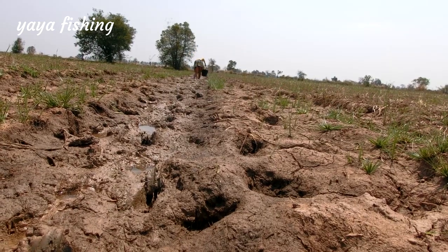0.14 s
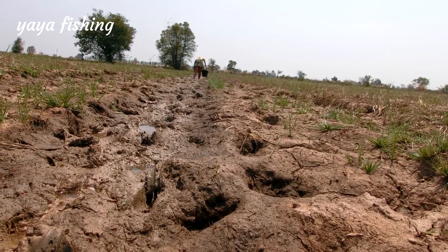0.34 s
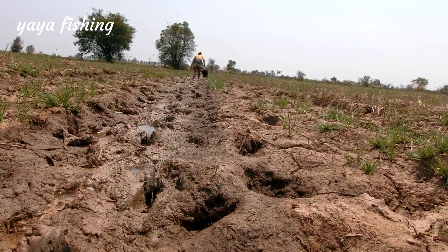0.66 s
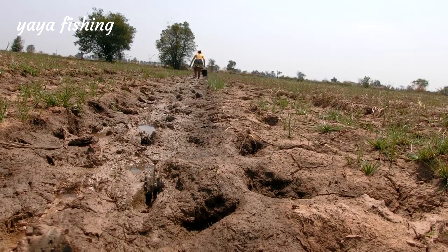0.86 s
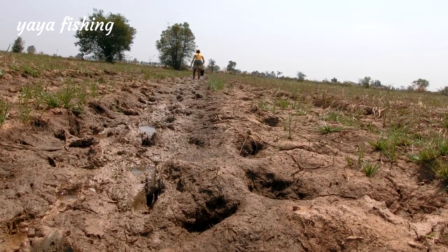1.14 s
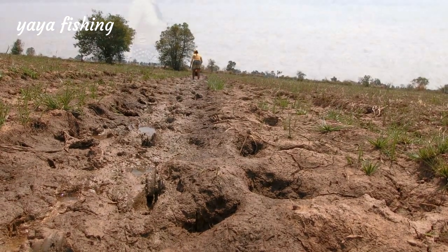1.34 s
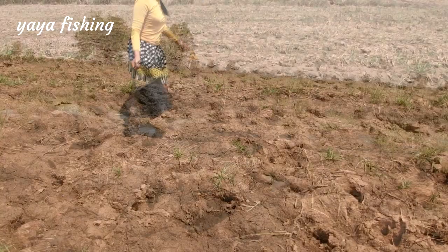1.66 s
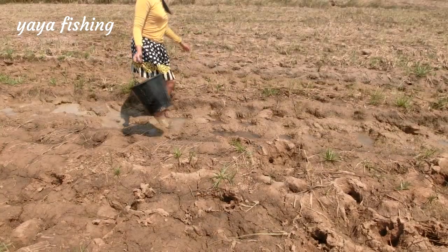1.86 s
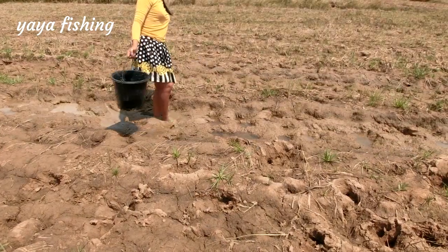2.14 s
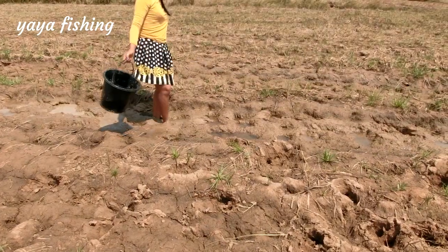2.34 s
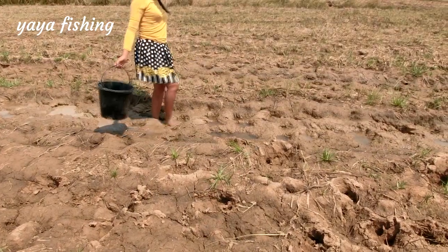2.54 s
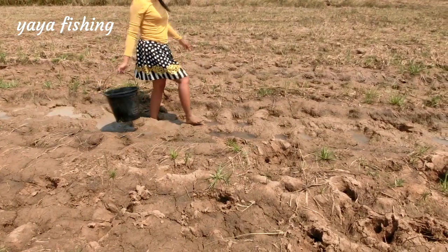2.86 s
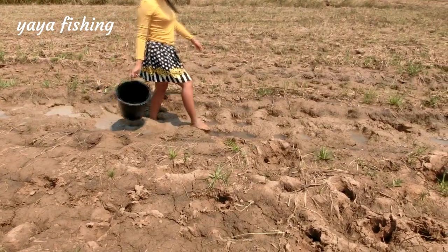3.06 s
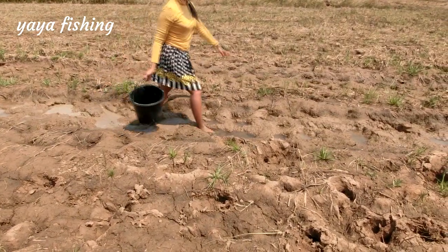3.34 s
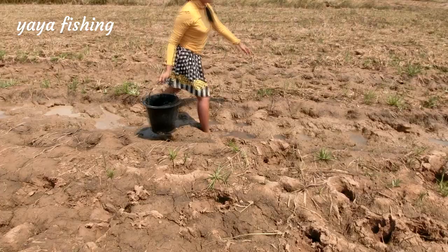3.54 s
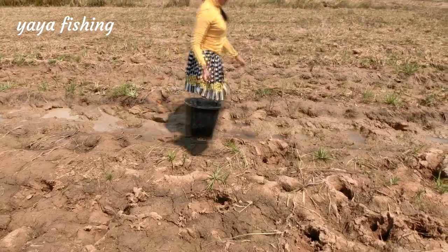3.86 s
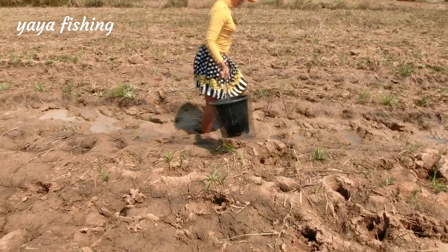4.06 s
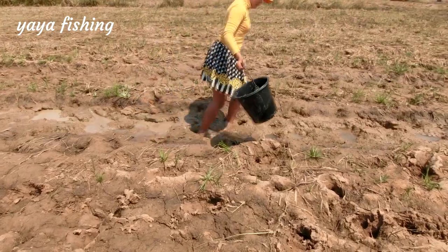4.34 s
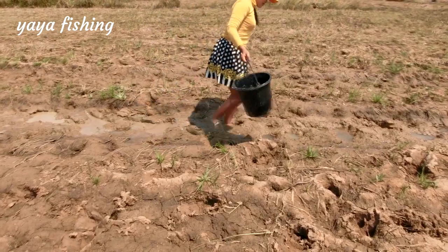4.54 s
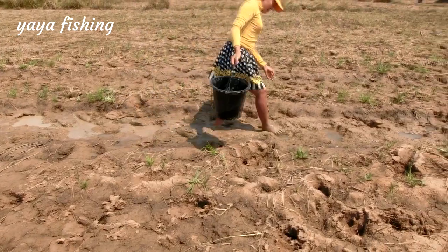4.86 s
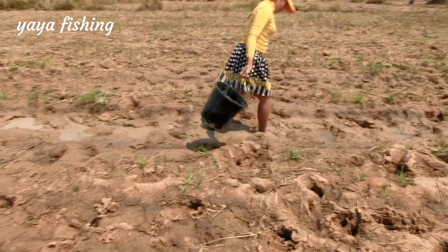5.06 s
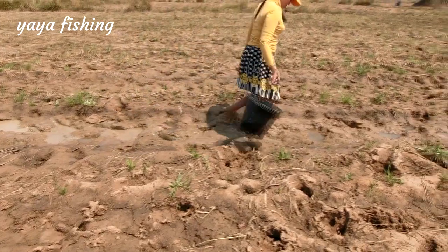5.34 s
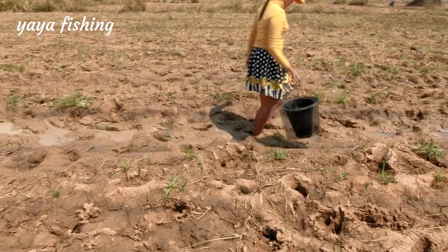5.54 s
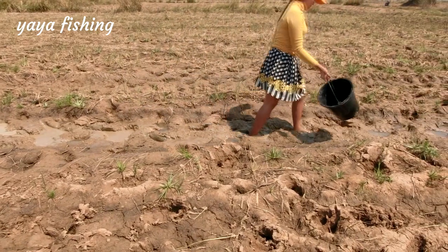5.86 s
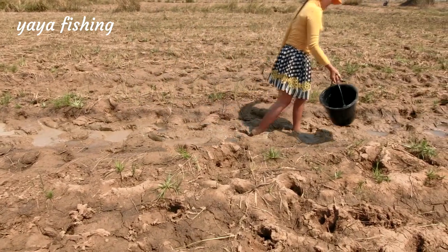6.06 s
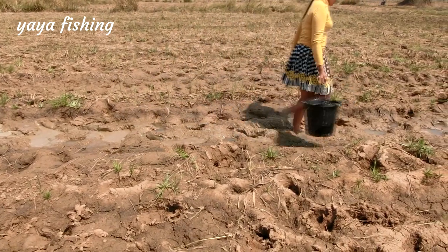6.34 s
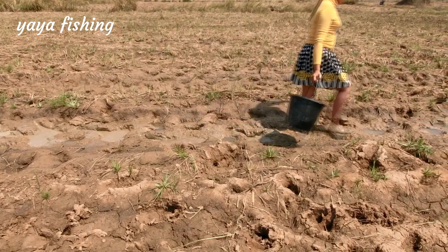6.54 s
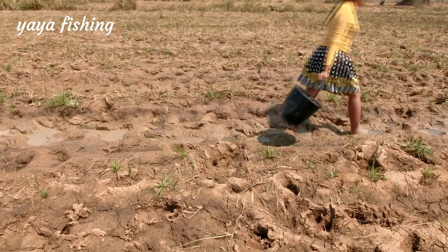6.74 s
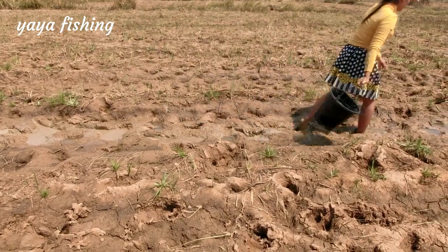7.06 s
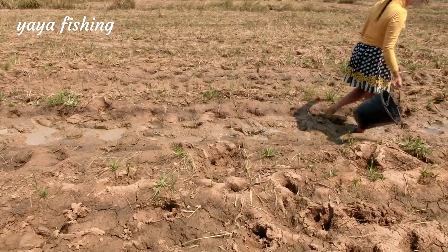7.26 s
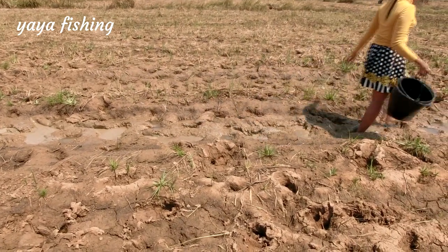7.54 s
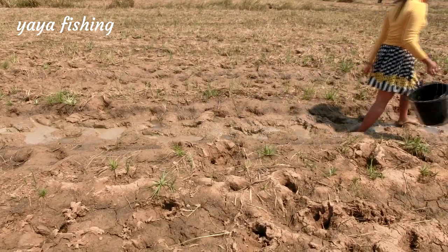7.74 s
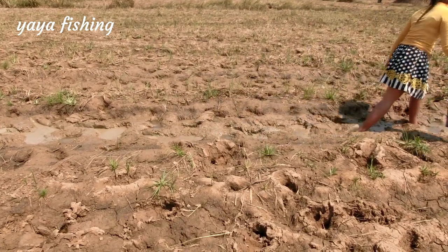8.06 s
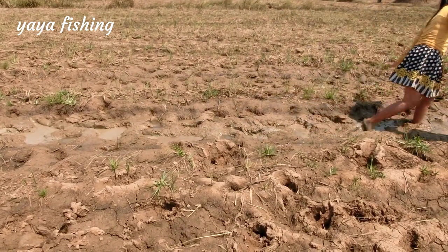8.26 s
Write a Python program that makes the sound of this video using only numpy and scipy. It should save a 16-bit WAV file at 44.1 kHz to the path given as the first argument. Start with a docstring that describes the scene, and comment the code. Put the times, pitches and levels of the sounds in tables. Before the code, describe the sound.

Someone walks barefoot through sticky, waterlogged mud outdoors, heard fairly close and dry, with little echo. Before the steps come a very short, high cricket chirp and a pair of thin insect rasps over nearly silent air. Each slow step mixes bubbly gurgling, crisp crackle, fine spray, ragged pops and occasional dull thuds. The strongest is a thick cluster of wet smacks near the middle; later squelches are sparser and finish quietly.

```python
"""Faint air with a wavering bass and a soft hiss lies under an open field. A cricket chirps once, fast sliding strokes,
and another insect rasps twice, high ticking noise. Then bare feet wade through wet mud a few metres away: gurgle,
crackle and spray are swarms of tiny damped sines in noise; bubbles snap open with a crack and a ring; air pockets pop
hollow and ragged; the wet surface smacks in bursts of noise; low damped sines thud as a foot reaches firm ground."""
import sys
import numpy as np
from scipy import signal
from scipy.fft import rfft, irfft, next_fast_len
from scipy.io import wavfile
from scipy.ndimage import map_coordinates

SR = 44100
rng = np.random.default_rng(int(sys.argv[2]) if len(sys.argv) > 2 else 0)


def put_to_file(sound):
    """Save the sound as 16-bit audio at rate SR, in the file named by the first command-line argument."""
    columns = np.atleast_2d(sound).T  # one column per channel
    safe = np.clip(columns, -1, 1)
    whole_steps = np.round(safe * 32767)
    wavfile.write(sys.argv[1], SR, whole_steps.astype(np.int16))


N = 370263

LEAD = 400  # samples kept ahead of a burst's peak
SINCE = (np.arange(1600) - LEAD) / SR  # seconds from that peak


def amp(db):
    """Decibels to amplitude."""
    return 10 ** (np.asarray(db) / 20)


def unit(x):
    """Scale to an rms of 1."""
    return x / np.sqrt(np.mean(x ** 2) + 1e-20)


def along(points, hz):
    """Read (frequency [Hz], value) points on a log frequency axis."""
    f, value = np.transpose(points)
    return np.interp(np.log(hz + 1), np.log(f + 1), value)


def curves(rows):
    """One dB value per sample for each column after the time, silent outside."""
    s, *columns = np.transpose(rows)
    t = np.arange(N) / SR
    return [np.interp(t, s, column, left=-140, right=-140) for column in columns]


def drift(step):
    """A smooth random curve with a new random point every step samples."""
    return map_coordinates(rng.standard_normal(N // step + 4), [np.arange(N) / step])


def filtered(x, response):
    """Filter x by a (possibly complex) response of frequency in Hz."""
    m = next_fast_len(N + SR // 2)
    return irfft(rfft(x, m) * response(np.fft.rfftfreq(m, 1 / SR)), m)[..., :N]


def above(x, lo_hz):
    """Steep causal high-pass."""
    return filtered(x, lambda hz: (1j * hz / (lo_hz + 1.4j * hz - hz * hz / lo_hz) * 1j * hz / lo_hz) ** 2)


def scatter(s, rows):
    """Sum of short sounds (rows), each starting at its time s."""
    at = np.round(s * SR).astype(int)[:, None] + np.arange(rows.shape[1])
    return np.bincount(at.ravel(), rows.ravel(), N + SR)[:N]


def bubbles(s, db, hz, t60, rise, attack, size):
    """Damped sines whose pitch climbs as the cavity closes."""
    t = np.arange(size) / SR
    hz, t60 = hz[:, None], np.clip(t60, .0005, .25)[:, None]
    tone = np.sin(2 * np.pi * hz * (t + rise * t * t / t60))
    decay = amp(db[:, None] - 60 * t / t60)
    return scatter(s, decay * (1 - np.exp(-t / attack)) * tone)


def swarm(count, hz, spread, cycles, uneven_db, hiss, size):
    """Bubbles at random moments, sizes and pitches over a share of noise, bunched in clumps; rms 1."""
    when, pitch = rng.random(count), rng.standard_normal(count)
    big = np.minimum(rng.exponential(1, count), 3.5)
    f = np.clip(hz * np.exp(spread * pitch), 450, 15000)
    grains = unit(bubbles(when * N / SR, uneven_db * big, f, cycles / f, 0.23, 0.000048, size))
    noise = filtered(rng.standard_normal(N), lambda w: np.exp(-.5 * (np.log((w + 1) / hz) / spread) ** 2))
    clumps = amp(3.2 * drift(1500))
    return unit((grains + hiss * unit(noise)) * clumps)


def burst(db, rise_ms, fall_ms, tail_db, linger):
    """Envelopes that halve in rise_ms before and fall_ms after the peak, plus a weak tail linger times slower."""
    rise, fall = [np.clip(v, .2, 20)[:, None] / 1000 for v in (rise_ms, fall_ms)]
    main = amp(-6 * np.where(SINCE < 0, -SINCE / rise, SINCE / fall))
    main = main * np.clip((SINCE - SINCE[0]) / .005, 0, 1)  # fade in without a click
    tail = (SINCE > 0) * amp(tail_db - 6 * SINCE / (fall * linger))
    return amp(db)[:, None] * (main + tail)


def ragged(hz, rough, glide):
    """Tones whose phase wanders as the soft walls tremble, and whose pitch climbs as the cavity closes."""
    hz = hz[:, None]
    wander = np.cumsum(rng.standard_normal((len(hz), len(SINCE))), axis=1) * np.sqrt(hz / SR)
    climb = SINCE + glide * np.maximum(SINCE, 0) ** 2
    return np.sin(2 * np.pi * hz * climb + rough * wander)


# colour of smack and spray: (frequency [Hz], level [dB per Hz])
SPRAY_COLOUR = [(880, -35), (1500, 25.5), (1920, 3.5), (2140, -2.5), (2770, -13.5), (3060, 3), (4640, -1.5),
                (5170, -2.5), (6370, -15.5), (7610, -9.5), (9470, -15), (12700, -16.5), (16000, -28.5)]


def bright(x, lo_hz):
    """Give x the wet spray colour above lo_hz."""
    return filtered(x, lambda hz: amp(along(SPRAY_COLOUR, hz)) / (1 + (lo_hz / (hz + 1)) ** 8))


AIR_DB = -63  # rms before the bass wavers and the channels are trimmed
# colour of the air before it is scaled: (frequency [Hz], level [dB per Hz])
AIR_COLOUR = [(12, 5), (25, -4.5), (60, -9.5), (120, -12.5), (270, -13.5), (450, -15), (700, -11),
              (950, -15.5), (1150, -18), (1600, -13), (2100, -18), (3000, -20.5), (11000, -24),
              (14900, -21.5), (16000, -38)]
# how alike the air is left and right: (frequency [Hz], correlation [0 to 1])
AIR_LIKENESS = [(60, 0.26), (150, 0.075), (380, 0.14), (950, 0.44), (2380, 0.036), (5980, 0.0096),
                (15000, 0.016)]


def air():
    """Distant air partly shared by both channels, hiss hardly at all; a light breeze makes the bass waver."""
    def mid_and_side(hz):
        turn = np.arccos(np.clip(along(AIR_LIKENESS, hz), -1, 1)) / 2
        return amp(along(AIR_COLOUR, hz)) * np.array([np.cos(turn), np.sin(turn)])

    mid, side = filtered(rng.standard_normal((2, N)), mid_and_side)
    pair = unit(np.array([mid + side, mid - side]))
    bass = filtered(pair, lambda hz: 1 / (1 + (hz / 170) ** 4))
    breeze = amp(0.77 * drift(6000) - 1.0)
    return amp(AIR_DB) * (pair - bass + bass * breeze)


CHIRP_S, CHIRP_DB = .1325, -49.5  # time of stroke 0, level of a full stroke before its random spread
CHIRP_STROKES, STROKE_HZ = 19.4, 158.6  # end of the chirp in strokes, strokes a second


def cricket():
    """Each wing stroke is a brief tone sliding down, after a faint run-up; grass nearby smears it a little."""
    t, k = np.arange(190) / SR, np.arange(-11, CHIRP_STROKES)
    stroke = np.sin(np.pi * t / t[-1]) ** 2 * np.sin(2 * np.pi * (8150 * t - 120000 * t * t))
    rise_db = np.clip(4.8 * (k - 1.5), -17, 0)
    fall_db = -5.5 * (k - CHIRP_STROKES + 1.6)
    size = amp(CHIRP_DB + np.minimum(rise_db, fall_db) + rng.normal(0, 0.98, len(k)))
    chirp = scatter(CHIRP_S + k / STROKE_HZ, size[:, None] * stroke)
    grass = rng.standard_normal(1300) * amp(-60 * np.arange(1300) / SR / 0.08)
    smear = signal.fftconvolve(chirp, grass / np.linalg.norm(grass))[:N]
    return chirp + amp(-4.0) * smear


RASP_RISE_DB_PER_S, RASP_FALL_DB_PER_S = 480, 450
# rasps of the second insect: (time of the peak [s], level [dB])
RASP_PEAKS = [(1.0, -63), (1.072, -55)]


def rasp():
    """High noise scraped in quick ticks, 190 a second, swelling and fading at each rasp."""
    t = np.arange(N) / SR
    ticks = 1 + 0.58 * np.maximum(np.sin(2 * np.pi * 190 * t), 0) ** 6
    hiss = filtered(rng.standard_normal((2, N)), lambda hz: np.exp(-((hz - 12300) / 2600) ** 2))
    swell = 0
    for s, db in RASP_PEAKS:
        slope_db = np.minimum(RASP_RISE_DB_PER_S * (t - s), RASP_FALL_DB_PER_S * (s - t))
        swell = swell + amp(db + slope_db)
    return swell * unit(ticks * hiss)


AFTER_S, FOLLOWS = 0.032, 0.28  # spread of the stirring round a burst, share of the burst's dB it follows


def aftermath(events):
    """Gain of 1 or more: how much the given bursts stir the mud nearby, just before and after them."""
    s, db = np.transpose(events)[:2]
    kicks = np.bincount((s * SR).astype(int), amp(2 * FOLLOWS * (db + 39.5)), N)
    bell = np.exp(-(np.arange(-6000, 6001) / SR / AFTER_S) ** 2)
    return np.sqrt(1 + 1.04 * np.abs(signal.fftconvolve(kicks, bell, "same")))


# how hard the feet stir the mud, before layer trims and aftermath gain:
# (time [s], overall level [dB], gurgle against overall [dB], spray against overall [dB])
STIRRING = [(1.3, -85, 6, -18), (1.55, -61.5, -0.5, -7), (2.0, -66, -4, 2), (2.5, -64, 2, -5.5),
            (2.75, -62.5, -4.5, -9), (2.95, -69, -10, 1), (3.18, -58.5, -7, -3.5), (3.5, -61.5, 1.5, -9),
            (3.9, -56, -1.5, -7), (4.2, -63.5, -5.5, 0), (4.5, -60.5, 2, -2), (4.9, -59.5, -5.5, -5.5),
            (5.28, -55.5, -10.5, -11), (5.55, -66, -7.5, -1), (5.95, -57, -10, -7), (6.1, -68.5, -2.5, -4),
            (6.4, -58.5, -7, -5), (6.62, -66, -12, -2), (6.9, -61, 1.5, -4.5), (7.3, -58.5, -11.5, -10.5),
            (7.55, -71, 3, 0.5), (8.0, -64, -3, -12), (8.4, -65.5, 2.5, -2.5)]


def stirred():
    """Small bubbles gurgle, the wet film crackles and fine spray hisses while a foot moves."""
    overall_db, gurgle_db, spray_db = curves(STIRRING)
    gurgle = swarm(count=2500, hz=1006, spread=0.446, cycles=40, uneven_db=6.5, hiss=1.0, size=900)
    crackle = swarm(count=7000, hz=3790, spread=0.37, cycles=28, uneven_db=8.5, hiss=0.79, size=300)
    mist = swarm(count=12000, hz=11000, spread=0.41, cycles=30, uneven_db=7.0, hiss=0.77, size=100)
    spray = unit(bright(mist, 6320))
    film = aftermath(MUD_SMACKS) * (amp(-6.5) * crackle + amp(spray_db - 2.5) * spray)
    depths = aftermath(AIR_POCKETS + BUBBLE_SNAPS) * amp(gurgle_db - 4.0) * gurgle
    return amp(overall_db) * (depths + film)


SNAP_RISE_MS, SNAP_CYCLES = 0.2, 2.27  # halving time of the rise, cycles for the ring to halve
CRACK_MS, CRACK_DB = 0.49, -2  # halving time of the crack, its level against the ring before filtering
# bubbles that snap open at once: (time of the peak [s], level before filtering [dB], pitch [Hz])
BUBBLE_SNAPS = [(1.409, -53, 2150), (1.933, -32.5, 2040), (2.1082, -38, 826), (2.3753, -32, 6230),
                (3.3005, -36.5, 4400), (3.4281, -32, 810), (3.5663, -33, 2770), (3.6125, -34, 3460),
                (3.7759, -29, 822), (5.423, -27.5, 1120), (5.764, -35, 2340), (6.4345, -39, 3630),
                (7.052, -39, 1250), (7.06, -42.5, 2530), (7.2855, -22.5, 1600), (7.3001, -24, 3640),
                (7.4094, -42.5, 1710), (1.9165, -41, 6000), (4.0342, -40, 7060), (6.1765, -33, 3100),
                (7.802, -52.5, 2500), (7.9545, -44.5, 830), (8.0065, -40, 850), (8.125, -42.5, 1770),
                (8.1346, -48, 5000), (8.158, -50, 910), (8.2834, -45.5, 2190), (8.3685, -47.5, 1060)]


def snaps():
    """The skin of a bubble breaks with a crack, and the cavity rings down cleanly."""
    s, db, hz = np.transpose(BUBBLE_SNAPS)
    rise_ms, crack_ms = np.full(len(s), SNAP_RISE_MS), np.full(len(s), CRACK_MS)
    ring = burst(db, rise_ms, SNAP_CYCLES * 1000 / hz, tail_db=-18.5, linger=7.1)
    ring = scatter(s - LEAD / SR, ring * ragged(hz, rough=0.31, glide=2.65))
    crack = burst(db + CRACK_DB, rise_ms, crack_ms, tail_db=-11, linger=12)
    crack = scatter(s - LEAD / SR, crack * rng.standard_normal(crack.shape))
    crack = filtered(crack, lambda f: 1 / (1 + 1j * f / 4500))  # soften the treble
    return above(ring + crack, 600)


POP_RISE_MS, POP_FALL_MS = 2.03, 1.49  # halving times of a 1 kHz pocket
BIG_IS_SLOW = 0.13  # lower pockets take longer by this power of pitch
TAIL_DB, LOUD_IS_DRY = -15.5, 0.38  # tail under a -44.5 dB pop; louder pops keep less of it, dB per dB
# air pockets bursting in the mud: (time of the peak [s], level before mixing its parts [dB], pitch [Hz])
AIR_POCKETS = [(1.6203, -47, 800), (1.618, -50, 1560), (1.79, -57, 1680), (1.933, -37, 535),
               (1.9425, -39, 887), (1.9473, -43.5, 1600), (1.9801, -40.5, 923), (2.009, -43, 1050),
               (2.117, -47, 1140), (2.1405, -43.5, 870), (2.19, -52, 893), (2.316, -51, 900),
               (2.398, -50, 900), (2.3302, -45.5, 1040), (2.352, -45.5, 585), (2.364, -47.5, 1135),
               (2.3706, -43, 1440), (2.4093, -41.5, 1400), (2.4125, -45.5, 820), (2.4239, -49, 1520),
               (2.4907, -49, 1880), (2.5885, -45.5, 570), (2.637, -49.5, 1124), (2.6856, -48.5, 800),
               (2.7082, -47, 1520), (2.7269, -47, 1600), (2.741, -48.5, 793), (2.7849, -46, 1574),
               (2.8051, -45, 1196), (2.818, -41, 1560), (3.336, -51.5, 2220), (3.4493, -48, 900),
               (3.5232, -44.5, 850), (3.527, -44.5, 1400), (3.625, -45, 514), (3.739, -46, 1770),
               (3.797, -37.5, 450), (3.823, -39, 470), (3.8276, -43, 673), (3.8679, -45, 1420),
               (3.8753, -40.5, 976), (3.8822, -39, 1273), (3.97, -53, 2230), (3.9803, -49.5, 1480),
               (4.166, -30, 1464), (4.17, -21.5, 1443), (4.1832, -38.5, 630), (4.1856, -35, 1740),
               (4.192, -42, 1580), (4.309, -38, 970), (4.3178, -36, 820), (4.3276, -34, 944),
               (4.339, -42, 1900), (4.3434, -31.5, 940), (4.345, -32, 566), (4.3494, -36, 1670),
               (4.357, -26.5, 830), (4.3602, -36, 1930), (4.361, -34.5, 573), (4.3677, -28, 863),
               (4.3758, -39, 886), (4.377, -32, 574), (4.438, -46, 1196), (4.445, -45, 587),
               (4.4615, -46, 1210), (4.488, -48, 1110), (4.493, -45, 2210), (4.512, -50, 1144),
               (4.886, -48.5, 733), (4.977, -43.5, 728), (5.0, -47, 1240), (5.132, -46.5, 1160),
               (5.164, -46.5, 1520), (5.21, -52, 900), (5.24, -44, 1196), (5.2733, -48, 870),
               (5.3078, -44, 1470), (5.36, -44.5, 1660), (5.3886, -44.5, 1026), (5.768, -45, 1710),
               (5.8235, -44, 1520), (5.88, -50.5, 1150), (5.9434, -45.5, 1077), (5.959, -47, 1670),
               (5.992, -52, 1690), (6.1509, -49, 623), (6.1657, -46, 690), (6.1672, -46, 1215),
               (6.1775, -42, 636), (6.1775, -44.5, 1250), (6.3706, -41, 662), (6.402, -44.5, 1660),
               (6.435, -55, 1590), (6.6102, -52.5, 1760), (6.812, -53, 1095), (6.8746, -49.5, 774),
               (6.8888, -47.5, 1100), (7.134, -48, 784), (7.2202, -49.5, 756), (7.234, -54, 785),
               (7.268, -49, 1000), (7.2895, -29.5, 1140), (7.297, -33, 1070), (7.302, -40, 695),
               (7.313, -51, 1200), (7.966, -48, 910), (7.99, -50, 870), (8.272, -51.5, 1570),
               (8.18, -48, 1830)]


def pops():
    """Each pocket rings raggedly at its pitch, with a weaker neighbour and a slap of mud."""
    s, db, hz = np.transpose(AIR_POCKETS)
    slow = (1000 / hz) ** BIG_IS_SLOW
    tail_db = (TAIL_DB - LOUD_IS_DRY * (db + 44.5))[:, None]
    shape = burst(db, POP_RISE_MS * slow, POP_FALL_MS * slow, tail_db, linger=14)
    neighbour_hz = hz * np.exp(.35 * rng.standard_normal(len(s)))
    ring = ragged(hz, rough=0.51, glide=3.6)
    ring = ring + amp(-3.5) * ragged(neighbour_hz, rough=1.0, glide=2.14)
    slap = scatter(s - LEAD / SR, amp(-4.0) * shape * rng.standard_normal(shape.shape))
    slap = filtered(slap, lambda f: 1j * f * 1400 / (1300 ** 2 - f * f + 1j * f * 1400))  # band round 1300 Hz
    return above(scatter(s - LEAD / SR, shape * ring) + slap, 392)


SMACK_RISE_MS, SMACK_FALL_MS = 0.6, 0.91  # typical halving times, varied a little per smack
# wet smacks as the mud tears or a drop lands: (time of the peak [s], level before mixing its parts [dB],
# pitch [Hz], spray against the smack before its 8 dB lift and colour [dB])
MUD_SMACKS = [(1.623, -42.5, 3620, -10), (1.8333, -52.5, 9100, 15.5), (1.8518, -39.5, 3570, 3),
              (1.925, -38, 5900, 9), (1.933, -32.5, 5870, 5.5), (1.947, -37, 3260, 2),
              (1.954, -43, 4660, -5), (1.9819, -42, 3390, -12), (1.9893, -42.5, 9500, -1),
              (2.117, -45, 7250, 9), (2.1278, -35, 7260, 6), (2.1532, -41, 4730, 4),
              (2.2585, -40.5, 2540, 3.5), (2.2642, -47, 2800, 8), (2.2753, -50, 4030, 8),
              (2.2818, -43.5, 3660, 1), (2.309, -51, 8400, 16.5), (2.346, -39.5, 9150, -10),
              (2.609, -55, 8700, 13), (2.6785, -52, 8500, 13), (2.6887, -38, 3620, 1),
              (2.698, -49, 3900, -18), (2.706, -33.5, 3490, -37), (2.722, -42, 3700, -18),
              (2.8028, -39, 8560, 1), (3.188, -38, 8700, 5), (3.4303, -46, 4800, -17),
              (3.4573, -50, 3600, -2), (3.467, -41.5, 3580, -19), (3.5251, -32, 4370, -1.5),
              (3.575, -42, 3500, -14), (3.632, -41, 5460, -10), (3.6788, -38.5, 8400, -9),
              (3.7032, -43, 8100, -8), (3.7346, -38, 2940, -5), (3.7752, -51, 3850, 7),
              (3.8587, -42, 5200, -5), (3.933, -48, 4500, 11), (3.994, -40.5, 3450, 0),
              (4.0672, -39, 8200, 3), (4.1416, -37.5, 8700, -3), (4.157, -31.5, 4540, -2),
              (4.1607, -30.5, 9140, 0), (4.1662, -25.5, 3370, -12), (4.1695, -26, 6880, 1.5),
              (4.199, -39, 4530, 4), (4.2887, -29.5, 8300, -2), (4.2925, -25.5, 8200, 3),
              (4.301, -44, 5230, -5), (4.2963, -32, 3620, -11), (4.3094, -29, 3400, -1),
              (4.3174, -18.5, 3840, -16), (4.324, -14, 3620, -26), (4.3336, -14, 3490, -31),
              (4.3385, -24, 3400, -15), (4.3457, -17, 3830, -25), (4.3527, -22, 3290, -22),
              (4.3547, -21.5, 3830, -28), (4.3658, -29, 3730, -19), (4.374, -29.5, 2870, -17),
              (4.494, -38, 4050, -16), (4.506, -42, 7700, -16), (4.5277, -38, 4140, -5),
              (4.584, -42, 7840, 10), (4.649, -44, 7400, -14), (4.661, -38.5, 7660, 3),
              (4.6706, -56, 6900, -7), (4.715, -39.5, 9500, 3), (4.7941, -32.5, 7260, -1),
              (4.8116, -31, 7040, 0), (4.82, -33.5, 7200, 4), (4.829, -37, 8010, 4), (4.846, -37, 8950, 2),
              (4.885, -32, 3600, 4), (4.8902, -32, 7200, 0), (4.9013, -34.5, 8500, -3),
              (4.907, -40, 5660, 8), (4.9924, -39, 8690, 8.5), (4.9966, -26.5, 7600, -2),
              (5.0093, -39, 3260, -19), (5.0898, -47, 4070, -23), (5.129, -52, 4500, 6),
              (5.1716, -39.5, 3500, 3.5), (5.239, -43, 3800, -6), (5.307, -41.5, 3860, 4),
              (5.3594, -39.5, 2390, -6), (5.4228, -40, 5400, 4.5), (5.4945, -42.5, 8230, 4.5),
              (5.532, -48, 8250, 5), (5.5981, -51, 8540, 13), (5.629, -38.5, 8440, 7),
              (5.642, -41, 8050, 9), (5.761, -34, 7550, 0), (5.7733, -30.5, 2940, -15),
              (5.7745, -33, 8300, 9), (5.8042, -36.5, 5300, 0), (5.8272, -33.5, 7900, 4),
              (5.8484, -38, 7500, -10), (5.9825, -46.5, 8800, 7), (6.005, -47.5, 8590, 5),
              (6.1494, -43, 3380, 5), (6.1648, -40, 2880, -18), (6.105, -47, 4000, -10),
              (6.368, -42, 9130, 8), (6.4044, -34.5, 4680, -1.5), (6.7483, -47, 8750, 5.5),
              (6.8127, -40.5, 7640, -11), (6.823, -50, 6000, -3), (7.153, -43, 3300, -12),
              (6.968, -44, 4870, -5), (6.986, -44, 3170, -17), (6.892, -51, 3360, -6),
              (7.1084, -39.5, 5300, -8), (7.2476, -44, 7950, -5), (7.288, -22.5, 5090, -8),
              (7.234, -51, 7900, -3), (7.3188, -36, 4250, -20), (7.41, -53, 2350, -22),
              (7.475, -39.5, 4220, -5), (8.1272, -42.5, 4680, -3), (7.361, -48, 2600, -10),
              (7.3975, -49, 4200, -16), (7.4315, -52, 3700, -2), (7.526, -49, 8560, 0),
              (7.744, -51, 8650, 2), (7.768, -50, 3820, 1), (8.085, -49, 4500, -5), (6.563, -49, 8100, 3),
              (6.685, -49, 3500, 5), (7.904, -47.5, 4350, -8), (7.9315, -48, 5430, -12),
              (8.272, -46, 2580, -18), (8.369, -46, 2500, -10), (5.926, -42, 2350, -7),
              (2.661, -46.5, 3360, -10)]


def smacks():
    """A tiny cavity rings while a burst of noise and spray flares and dies."""
    s, db, hz, spray_db = np.transpose(MUD_SMACKS)
    size = np.exp(0.067 * rng.standard_normal(len(s)))
    shape = burst(db, SMACK_RISE_MS * size, SMACK_FALL_MS * size, tail_db=-13.5, linger=7.9)
    # the film stretches and hisses around the break
    stretch = np.exp(-(SINCE / np.where(SINCE < 0, 0.008, 0.012)) ** 2)
    shape += amp(.8 * db - 27)[:, None] * stretch
    tear, mist = rng.standard_normal((2, *shape.shape)) * shape
    ring = amp(-6.5) * shape * ragged(hz, rough=0.72, glide=1.36)
    ring = above(scatter(s - LEAD / SR, ring), 1860)
    body = bright(scatter(s - LEAD / SR, amp(-3.5) * tear), 2190)
    spray = bright(scatter(s - LEAD / SR, amp(spray_db + 8)[:, None] * mist), 7530)
    return ring + body + spray


# a foot reaches firm ground: (time of the onset [s], level before a 2.5 dB cut and churn [dB],
# pitch [Hz], time to fall 60 dB [s])
FOOT_THUDS = [(1.931, -52, 348, 0.032), (2.113, -39.5, 267, 0.023), (3.777, -45.5, 237, 0.18),
              (4.164, -52, 225, 0.11), (4.323, -40, 225, 0.1), (4.33, -46, 97, 0.078),
              (7.282, -45, 304, 0.22), (7.284, -39, 167, 0.031), (7.286, -51, 100, .07)]


def thuds():
    """Low dull pushes, broken up by the mud that closes round the foot."""
    s, db, hz, t60 = np.transpose(FOOT_THUDS)
    push = bubbles(s, db - 2.5, hz, t60, 0.02, 0.0015, size=6000)
    churn = unit(drift(300))
    return push * amp(2.2 * churn)


# stereo width of the scattered part of the steps: (frequency [Hz], side against mid [dB])
STEP_WIDTH = [(100, -12), (700, -20), (1500, -15), (3000, -16), (5500, -7), (9000, -3), (15000, -2)]


def ports(x):
    """Stereo steps: three scattered paths fade in and out in turn as the side; the left is brighter."""
    echoes = rng.standard_normal((3, 260)) * amp(-60 * np.arange(260) / SR / 0.013)
    echoes = echoes / np.linalg.norm(echoes, axis=1, keepdims=True)
    paths = signal.fftconvolve(x[None], echoes, axes=1)[:, :N]
    turn = 2 * np.pi * (6 * np.arange(N) / SR + np.arange(3)[:, None] / 3)  # six turns a second
    scattered = np.sum(paths * np.cos(turn), axis=0) / np.sqrt(1.5)
    side = filtered(scattered, lambda hz: amp(along(STEP_WIDTH, hz)))
    side = side + filtered(x, lambda hz: .04 + .3 * hz ** 2 / (hz ** 2 + 6000 ** 2))  # lean left in the treble
    return np.array([x + side, x - side])


def scene():
    """The air, the insects and the wading feet, placed left and right."""
    background = air() * amp([[.4], [-.4]])
    insects = cricket() * amp([[1.5], [-1.5]]) + rasp()
    walker = stirred() + snaps() + pops() + smacks() + thuds()
    return background + insects + ports(walker)


TOP_HZ = 15900


def record(dry):
    """Band limit: nothing at or above TOP_HZ is kept."""
    return filtered(dry, lambda hz: hz < TOP_HZ)


dry = scene()
out = record(dry)
put_to_file(out)
```